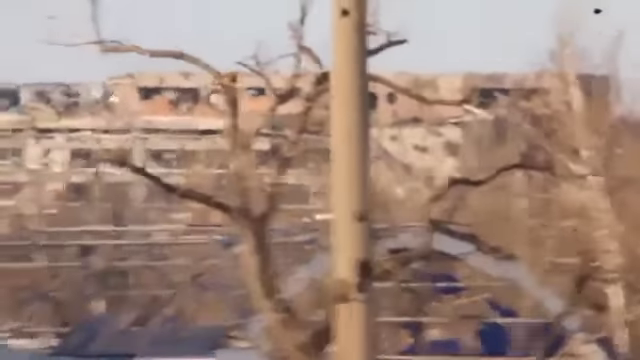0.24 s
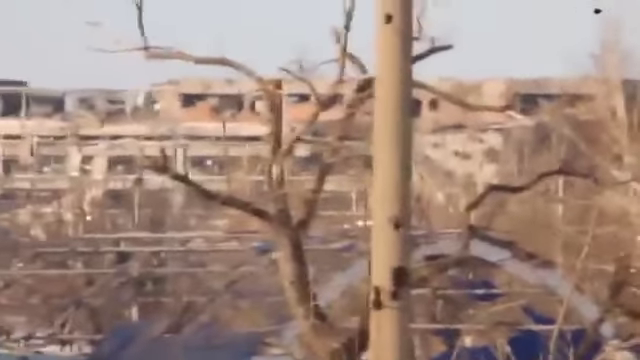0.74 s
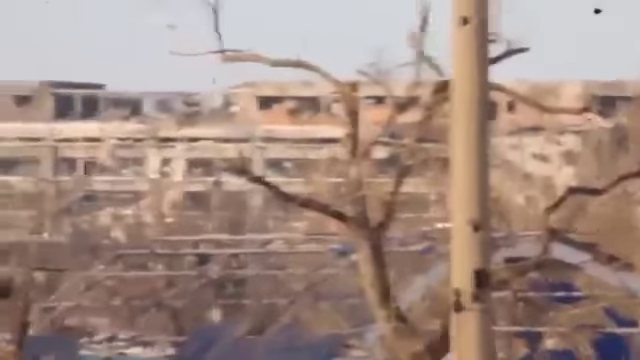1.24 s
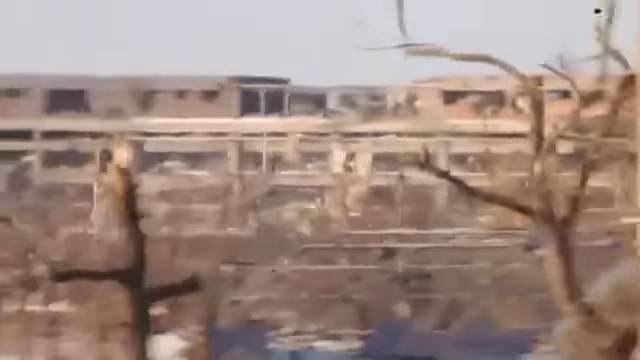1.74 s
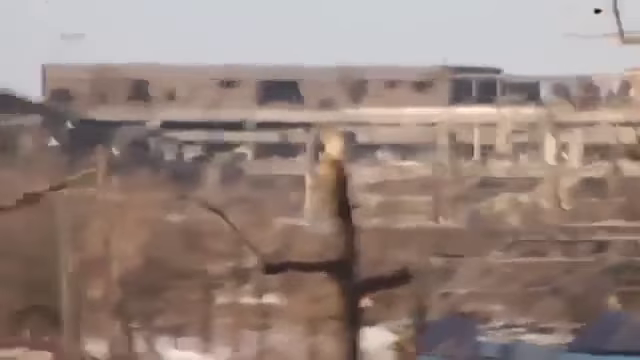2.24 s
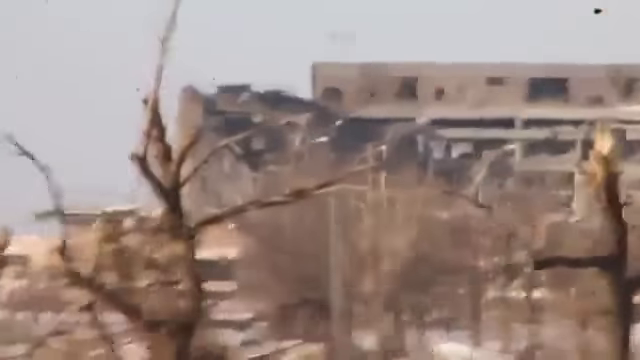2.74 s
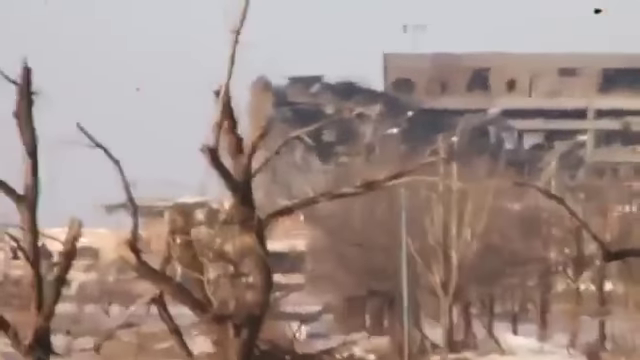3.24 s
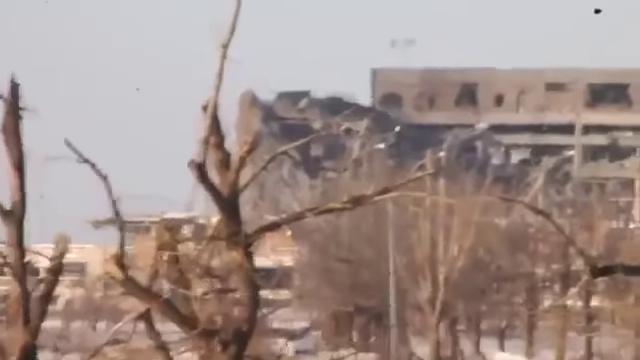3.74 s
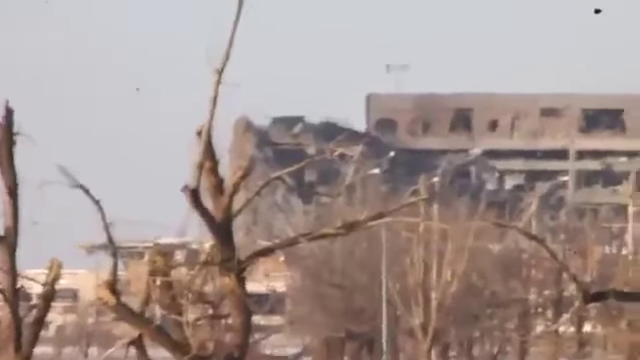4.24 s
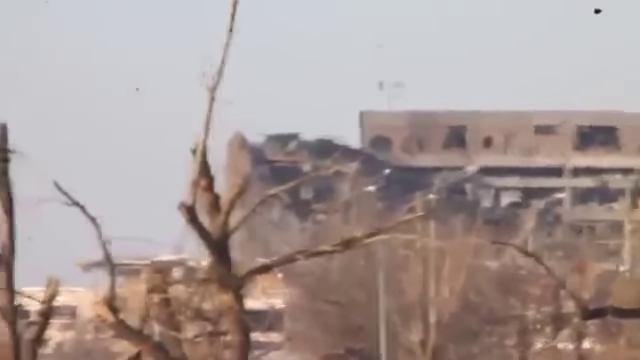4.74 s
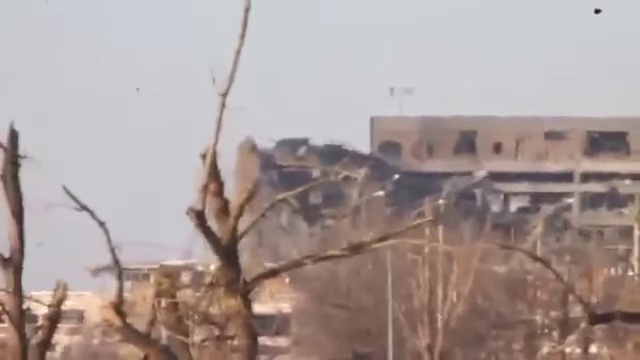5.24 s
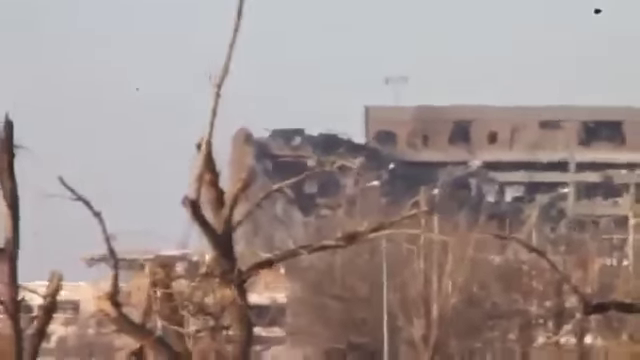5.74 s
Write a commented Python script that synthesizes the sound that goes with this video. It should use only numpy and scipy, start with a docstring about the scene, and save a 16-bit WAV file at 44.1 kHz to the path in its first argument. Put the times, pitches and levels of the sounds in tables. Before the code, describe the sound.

Quiet outdoor air with a few distant echoing gunshots and cloth rustle, then a gust builds and violently buffets the handheld microphone.

```python
"""Outdoors among ruined buildings, a gust builds and buffets a hand-held microphone.
Vortex-shaped pulses make the thumps and the stream of eddies, shaped noise the flutter, and the
hardest swings flatten at the input and crack. Before the gust a few far shots, short damped waves
with a bright edge of noise, echo over the open ground. Grainy noise in strokes and bands makes cloth
rustles, scuffs, ticks and a soft breath-like swish; uneven coloured noise is the air of the place."""
import sys
import numpy as np
from scipy import signal
from scipy.fft import rfft, irfft
from scipy.io import wavfile
from scipy.ndimage import uniform_filter1d

SR = 44100
rng = np.random.default_rng(int(sys.argv[2]) if len(sys.argv) > 2 else 0)


def unload_wav(signal):
    """Save mono or channel-first audio to the path in sys.argv[1] as 16-bit WAV at rate SR, clipped to [-1, 1]."""
    wavfile.write(
        sys.argv[1],
        SR,
        np.round(np.clip(np.atleast_2d(signal).T, -1, 1) * 32767).astype(np.int16),
    )


N = 263718
TIME = np.arange(N) / SR
EDDY_TIME = np.arange(-1323, 1323) / SR  # 60 ms around the centre of an eddy

# Bed of outdoor air, far hum of the town and microphone hiss: (frequency [Hz], relative level [dB per Hz])
AIR_COLOUR = [(25, -7.5), (60, 0.5), (150, -1), (280, 0), (430, 2), (555, 2), (660, -2.5), (1000, -7),
              (1700, -14), (3000, -19.5), (5000, -22.5), (8000, -26), (10500, -32.5), (15000, -33)]
AIR_DB = -51.5  # rms level

# Wind between the buffets, light air and then the gust with its lulls: (time [s], strength [dB])
WIND_STRENGTH = [(0, -64.5), (1.3, -57.5), (1.75, -48.5), (2.1, -60), (2.55, -41), (2.97, -60),
                 (3.25, -45.5), (3.45, -29.5), (3.8, -35.5), (4.22, -35), (4.4, -42), (4.48, -35),
                 (4.58, -31), (4.8, -19.5), (4.92, -33.5), (5.3, -30.5), (5.76, -36), (5.98, -35.5)]
# Pitch of the random eddies, higher in stronger wind: (wind strength [dB], centre [Hz])
EDDY_PITCH_BY_STRENGTH = [(-44.5, 104), (-29.5, 150.6), (-21.5, 221)]

# Buffets of wind on the microphone, levels before the trims in buffets():
# (time [s], thump level [dB], level of the fine flutter around it [dB], half-length [s])
WIND_BUFFETS = [(0.023, -34.5, -51, 0.035), (.401, -33, -77, 0.016), (.772, -37, -86, 0.027),
                (.881, -37, -68, 0.067), (1.235, -35, -74, 0.013), (1.265, -34, -78, 0.026),
                (1.6, -26, -92, 0.019), (1.82, -30.5, -65, 0.0064), (2.345, -26, -72, 0.024),
                (2.479, -27, -57, 0.046), (2.618, -21.5, -47.5, 0.02), (3.086, -20, -74, 0.019),
                (3.169, -30, -82, 0.01), (3.279, -21.5, -86, 0.0038), (3.386, -16.5, -64, 0.0067),
                (3.414, -13, -72, .009), (3.487, -8.5, -40, 0.0051), (3.562, -17, -67, 0.0077),
                (3.623, -20, -59, 0.0043), (3.706, -13, -46, 0.02), (3.869, -17, -62, 0.019),
                (3.925, -16.5, -40.5, 0.0095), (4.064, -15, -60, 0.0052), (4.079, -14, -41.5, 0.0055),
                (4.132, -14, -47, 0.0056), (4.148, -11.5, -51, 0.0054), (4.17, -13.5, -45, 0.022),
                (4.237, -4.5, -29, 0.0078), (4.253, -8.5, -31.5, 0.014), (4.298, -8, -40.5, 0.0096),
                (4.317, -6, -36, 0.0082), (4.53, -3.5, -33, 0.016), (4.572, -6, -35, 0.0096),
                (4.595, -8, -37.5, 0.0052), (4.658, -7, -46, 0.0057), (4.673, 2, -43.5, 0.0046),
                (4.688, -8.5, -28.5, 0.01), (4.714, 2, -35, 0.0024), (4.733, -5.5, -34.5, 0.006),
                (4.754, -8, -41.5, 0.016), (4.791, -3, -39, 0.0041), (4.819, -18, -45, .009),
                (4.842, -7, -29, 0.013), (4.866, -12.5, -44, 0.012), (4.889, -16.5, -38, 0.0017),
                (4.926, -10, -32.5, 0.0072), (4.974, -9, -42.5, 0.0082), (5.019, -8.5, -48, 0.0019),
                (5.048, -10, -35.5, 0.0061), (5.075, -6.5, -32.5, 0.0078), (5.168, -11, -41, 0.013),
                (5.197, -12, -49, 0.007), (5.211, -9, -29.5, 0.0041), (5.23, -9, -41, 0.013),
                (5.265, -9, -34.5, 0.01), (5.286, -10.5, -43, .006), (5.327, -11.5, -40, 0.0052),
                (5.386, -8, -38, 0.013), (5.454, -18, -41, 0.0063), (5.48, -12.5, -40, 0.0017),
                (5.501, -14.5, -31, 0.0027), (5.528, -13, -39.5, 0.011), (5.589, -2.5, -25.5, 0.0037),
                (5.598, 1, -19, 0.0088), (5.616, -3, -31.5, 0.0018), (5.65, -14.5, -49, 0.0054),
                (5.692, -17.5, -74, 0.023), (5.833, -12.5, -68, 0.0095), (5.861, -12.5, -54, 0.0054),
                (5.905, -14.5, -63, 0.021), (5.949, -16, -51, 0.0066)]
# Colour of the flutter: (frequency [Hz], relative level [dB per Hz])
FLUTTER_COLOUR = [(150, -8), (280, 7), (480, 9.5), (750, 0), (1000, -5), (1500, -17), (2100, -35),
                  (2800, -49), (4500, -73)]
SWELL_DB = -9.5  # turbulence round a buffet, against the thump level
CORE_S = 0.0033  # the core of a buffet pushes the small eddies aside
# Pitch of a thump at the given flutter level; more flutter, higher thump
THUMP_HZ, THUMP_AT_DB, THUMP_OCTAVES_PER_DB = 245.6, -41.5, 0.0045

# Strokes of rubbing cloth: (start [s], length [s], level at the height of the stroke [dB])
CLOTH_STROKES = [(.04, .1, -60.5), (.3, .26, -62.5), (1.5, .15, -57.5), (1.62, .28, -52), (1.88, .26, -60),
                 (2.24, .03, -55), (2.22, .21, -53), (3.915, .022, -53.5), (3.98, .13, -60),
                 (4.085, 0.22, -54.5), (4.198, 0.026, -55), (4.91, .06, -63), (5.258, .01, -54),
                 (5.272, 0.017, -51), (5.296, 0.012, -51), (5.35, .012, -38.5), (5.355, 0.027, -51)]
# Colour of the cloth: (frequency [Hz], relative level [dB per Hz])
CLOTH_COLOUR = [(200, -20.5), (600, 4), (1200, 11.5), (2500, 2), (4500, 5.5), (6500, 3), (8500, 1),
                (10000, -8), (15000, -7.5)]
STROKE_SWELL = 0.68  # share of a stroke during which the rubbing builds

# Far shots: (time [s], level before the trim in shots() [dB], centre [Hz])
FAR_SHOTS = [(0.057, -36, 640), (1.760, -23.5, 664), (1.786, -30.5, 600), (1.819, -32, 443),
             (1.845, -35.5, 564)]
# Colour of their echo: (frequency [Hz], relative level [dB per Hz])
ECHO_COLOUR = [(80, 2), (250, 9.5), (600, -10), (1000, 5), (1600, 4), (3000, -4)]

# Scuffs, ticks, a soft breath-like swish at 0.5 to 0.95 s, and at 1.773 s the bright edge of the far
# shots: (time [s], level before the trim in gritty_bursts() [dB], centre [Hz], decay by 60 dB [s])
GRITTY_BURSTS = [(.078, -51.5, 1980, 0.45), (.412, -52.5, 756, 0.43), (.52, -56.5, 1460, 1.4),
                 (.7, -65, 1730, 1.1), (.843, -56, 8450, .028), (1.083, -58.5, 7360, .15),
                 (1.773, -50.5, 2000, .12), (1.964, -49.5, 3320, 0.096), (2.041, -46, 1320, 0.034),
                 (2.083, -51, 3020, 0.11), (2.197, -53, 2800, 0.053), (2.39, -52.5, 6900, 0.092),
                 (2.459, -48, 1500, 0.57), (2.785, -47, 2000, 0.032), (2.911, -46, 1210, 0.025),
                 (3.99, -55.5, 1780, 1.1), (4.14, -61, 1690, 1.3), (4.45, -44.5, 2070, 0.028),
                 (5.27, -52, 2000, 0.51)]
# Half-width of the band at a 1 s decay [octaves]; exponent that narrows the shorter bursts
BURST_OCTAVES, BURST_WIDENING = 0.71, 0.23

EDGE_HZ = 15100  # upper band limit


def gain_of(db):
    """Decibels to amplitude."""
    return 10 ** (np.asarray(db) / 20)


def evened(x):
    """Scales to rms 1."""
    return x / np.sqrt(np.mean(x ** 2) + 1e-20)


def follow(curve, at):
    """Reads a curve between its points."""
    return np.interp(at, *np.transpose(curve))


def add(mix, s, sound):
    """Mixes a sound in from time s on, trimming what falls outside."""
    start = round(s * SR)
    sound = sound[max(-start, 0):]
    part = mix[max(start, 0):][:len(sound)]
    part += sound[:len(part)]


def coloured(x, spectrum):
    """Gives x a spectrum, at rms 1."""
    hz, db = np.transpose(spectrum)
    bins = np.fft.rfftfreq(len(x), 1 / SR) + 1
    shape_db = np.interp(np.log(bins), np.log(hz), db)
    return evened(irfft(rfft(x) * gain_of(shape_db), len(x)))


def wander(per_s):
    """Slow chance of rms 1: random points, per_s of them a second, joined by lines."""
    knots = rng.standard_normal(N // 20)
    return evened(np.interp(TIME * per_s, np.arange(len(knots)), knots))


def eddy(hz, skew, order=2):
    """Pressure of a passing vortex: at zero skew a smooth dip between two shoulders; small ones sound higher."""
    width = (2 * order + 1) / (4 * np.pi * hz)
    vortex = np.exp(1j * skew) / (1 - 1j * EDDY_TIME / width) ** (order + 1)
    return -vortex.real


def air(patchy_db=1.5):
    """The outdoor background: noise made uneven in small patches of time and pitch, then coloured."""
    cells = signal.stft(rng.standard_normal(N), nperseg=1024)[2]
    chance = rng.standard_normal(cells.shape)
    patches = evened(uniform_filter1d(uniform_filter1d(chance, size=5, axis=0), size=5, axis=1))
    uneven = signal.istft(cells * gain_of(patchy_db * patches), nperseg=1024)[1][:N]
    return coloured(uneven, AIR_COLOUR) * gain_of(AIR_DB)


def gust():
    """Strength of the turbulence in dB: the wind, and a swell on both sides of each buffet."""
    power = gain_of(follow(WIND_STRENGTH, TIME)) ** 2
    for s, thump_db, _, half_s in WIND_BUFFETS:
        t = np.arange(-4 * half_s, 4 * half_s, 1 / SR)
        swell = np.exp(-(t / half_s) ** 2)
        hollow = 1 - np.exp(-(t / CORE_S) ** 2)
        add(power, s + t[0], gain_of(thump_db + SWELL_DB) ** 2 * swell * hollow)
    return 10 * np.log10(power)


def turbulence(scatter_octaves=0.4, level_db=-0.1, patchy_db=2.15, count=1300):
    """A stream of random eddies, stronger and smaller as the wind rises and louder round each buffet."""
    stream, strength_db = np.zeros(N), gust()
    places, skews = rng.random((2, count))
    sizes, strengths = rng.standard_normal((2, count))
    for k, (place, skew, size, strength) in enumerate(zip(places, skews, sizes, strengths)):
        s = (k + 2 * place) / count * N / SR
        wind_db = strength_db[min(round(s * SR), N - 1)]
        hz = follow(EDDY_PITCH_BY_STRENGTH, wind_db) * 2 ** (scatter_octaves * np.clip(size, -2, 2))
        add(stream, s - 0.03, gain_of(4 * strength) * eddy(hz, 2 * np.pi * skew, order=4))
    # level the stream first, so that its loudness then rides the gust
    local_power = uniform_filter1d(uniform_filter1d(stream ** 2, size=600), size=600)
    local_rms = np.sqrt(abs(local_power) + 1e-6)
    return stream / local_rms * gain_of(strength_db + level_db + patchy_db * wander(55))


def buffets(thump_trim_db=-1.5, flutter_trim_db=1, spread_share=0.25, lean=1.05, lumpy_db=3):
    """Each large eddy thumps once inside a swarm of small ones, which fills the middle of the buffet."""
    out = np.zeros(N)
    t = EDDY_TIME
    lumps = gain_of(lumpy_db * wander(400))
    chances = rng.standard_normal((len(WIND_BUFFETS), len(t)))
    for (s, thump_db, flutter_db, half_s), chance in zip(WIND_BUFFETS, chances):
        hz = THUMP_HZ * 2 ** (THUMP_OCTAVES_PER_DB * (flutter_db - THUMP_AT_DB))
        grains = chance * lumps[max(round(s * SR) - len(t), 0):][:len(t)]
        swarm = coloured(grains * np.exp(-abs(t) / (2 * spread_share * half_s)), FLUTTER_COLOUR)
        # weak eddies graze the port and give lopsided waves; the strongest hit it squarely
        skew = lean * np.tanh(chance[0]) * max(1 - gain_of(thump_db) ** 2, 0)
        thump = gain_of(thump_db + thump_trim_db) * eddy(hz, skew, order=3)
        add(out, s + t[0], thump + gain_of(flutter_db + flutter_trim_db) * swarm)
    return out


def rustle(grain_db=1.5, patchy_db=2.5):
    """Fibres catch and slip in fine grains under each stroke of the cloth."""
    stroke = [0, STROKE_SWELL, 1]
    rubbing = np.zeros(N)
    for start, length, db in CLOTH_STROKES:
        rubbing += gain_of(db) * np.interp((TIME - start) / length, stroke, [0, 1, 0])
    grains = rng.standard_normal(N) * gain_of(grain_db * wander(1500) + patchy_db * wander(90))
    return coloured(grains, CLOTH_COLOUR) * rubbing


def shots(ring_cycles=0.84, echo_db=-3.5, echo_t60=1.0, trim_db=4):
    """Distance rounds each report to a short damped wave; buildings scatter it into a rolling echo."""
    reports, t = np.zeros(N), np.arange(SR) / SR
    for s, level_db, hz in FAR_SHOTS:
        cycles = t * hz
        swell = 2 * cycles / ring_cycles
        wave = 2 * swell * np.exp(-swell) * -np.sin(2 * np.pi * cycles)
        add(reports, s - 0.002, gain_of(level_db + trim_db) * wave)
    # sparse random reflections, about 3 in 100 samples
    tail = coloured(rng.standard_normal(SR) * (rng.random(SR) < 0.03), ECHO_COLOUR)
    tail *= gain_of(-60 * t / echo_t60) * (1 - np.exp(-t / 0.02))
    echo = signal.fftconvolve(reports, tail / np.linalg.norm(tail))[:N]
    return reports + gain_of(echo_db) * echo


def gritty_bursts(rise_share=0.023, grain_db=1.0, trim_db=2):
    """Short ticks and longer soft scrapes, each grainy noise in its own band; the longer, the wider the band."""
    out, t = np.zeros(N), np.arange(SR) / SR
    bins = np.fft.rfftfreq(SR, 1 / SR) + 1
    grit = rng.standard_normal(N) * gain_of(grain_db * wander(400))
    for s, db, hz, t60 in GRITTY_BURSTS:
        half_width = BURST_OCTAVES * t60 ** BURST_WIDENING
        band = 1 / (1 + (np.log2(bins / hz) / half_width) ** 4)
        own_grit = np.roll(grit, -round(s * SR))[:SR]
        burst = evened(irfft(rfft(own_grit) * band, SR))
        rise = 1 - np.exp(-t / (rise_share * t60))
        add(out, s, burst * gain_of(db + trim_db - 60 * t / t60) * rise)
    return out


def scene():
    """Air, wind on the microphone, cloth, far shots and gritty bursts, summed to one channel."""
    return (air() + turbulence() + buffets() + rustle() + shots() + gritty_bursts())[None]


def record(dry):
    """The input flattens the largest swings, which crack; then a steep low-pass sets the band limit."""
    clipped = np.clip(dry, -0.7, 0.7)
    low_pass = signal.firwin(511, EDGE_HZ, window=("kaiser", 9), fs=SR)
    return signal.oaconvolve(clipped, low_pass[None], "same")


dry = scene()
out = record(dry)
unload_wav(out)
```